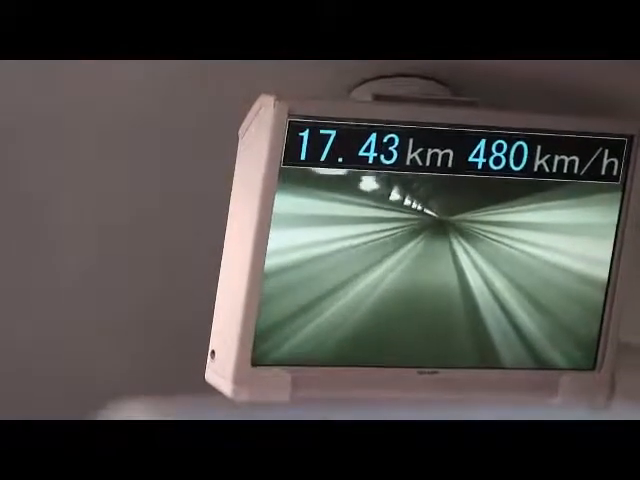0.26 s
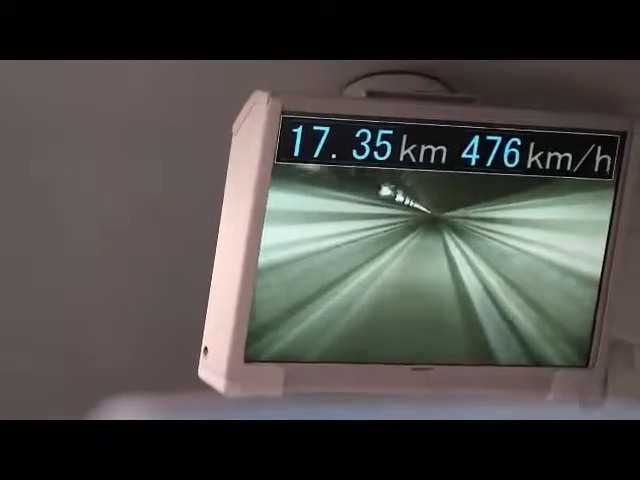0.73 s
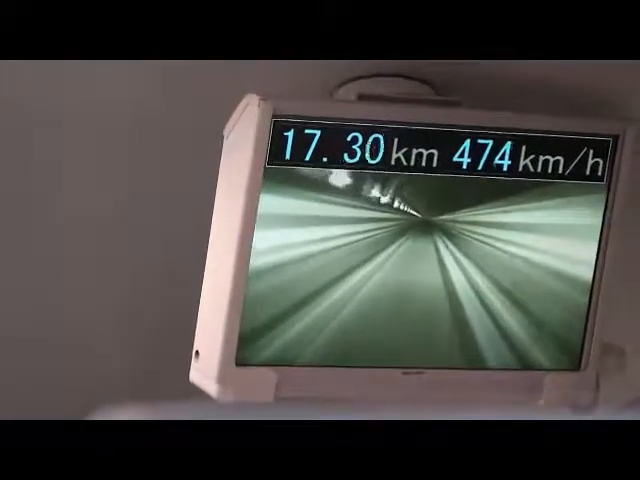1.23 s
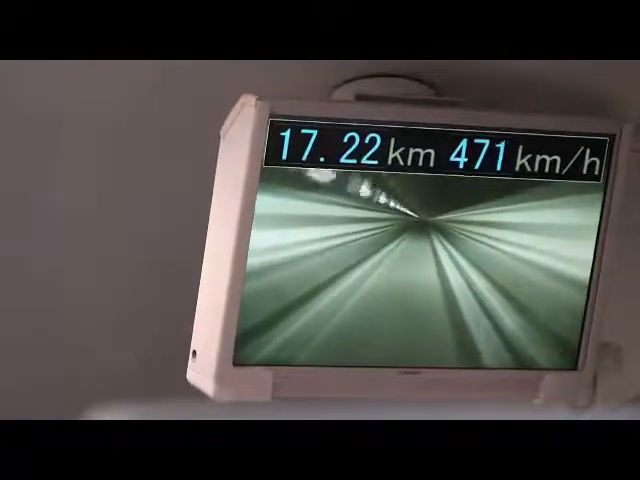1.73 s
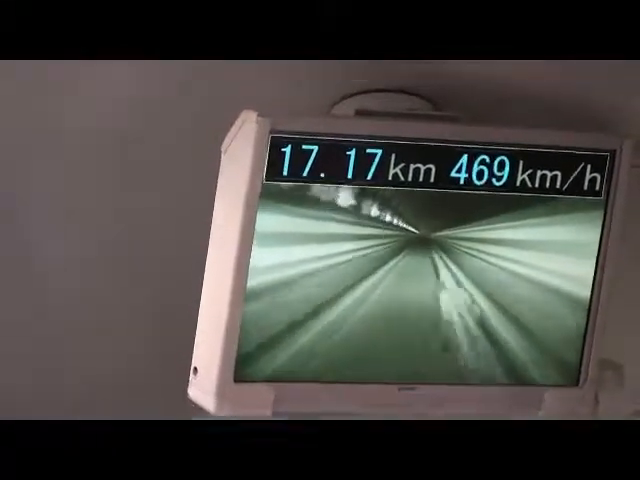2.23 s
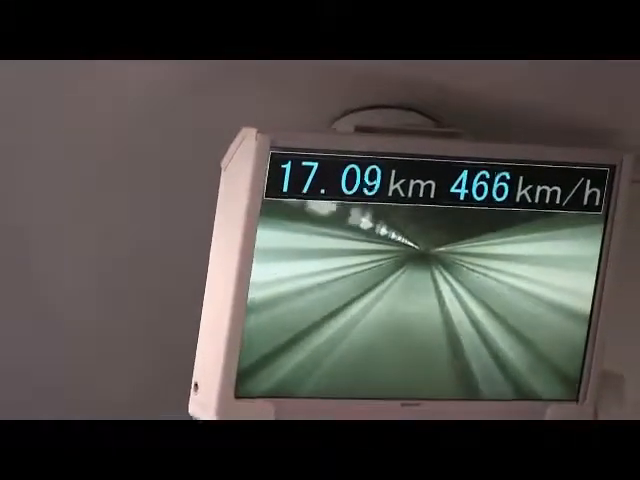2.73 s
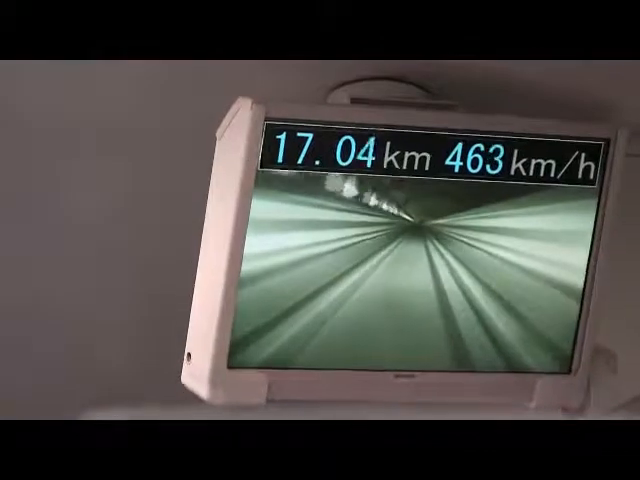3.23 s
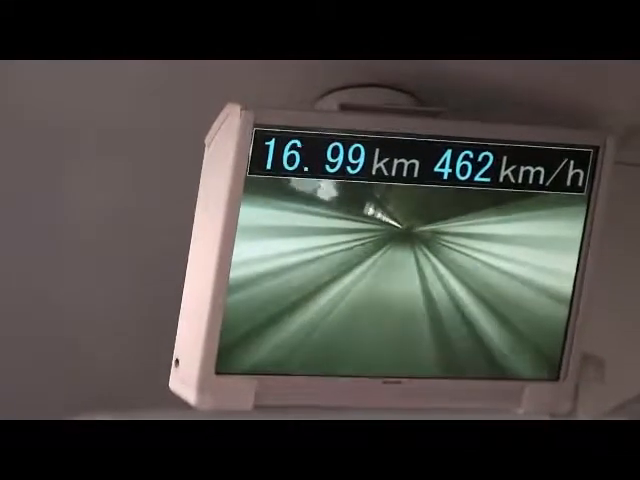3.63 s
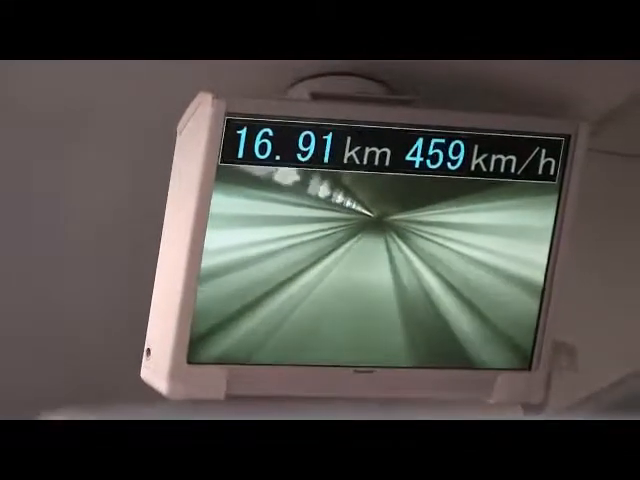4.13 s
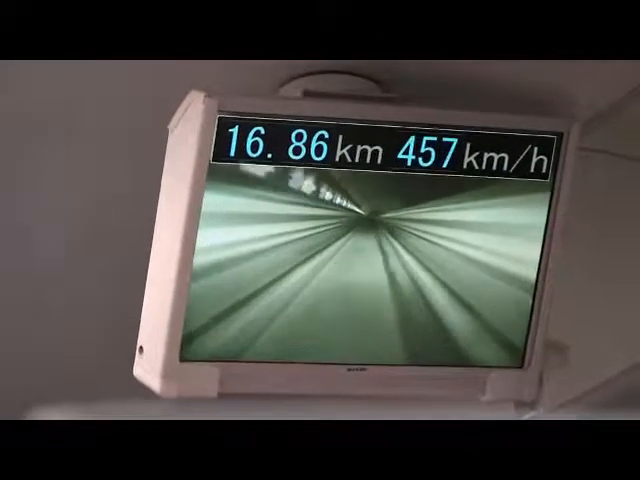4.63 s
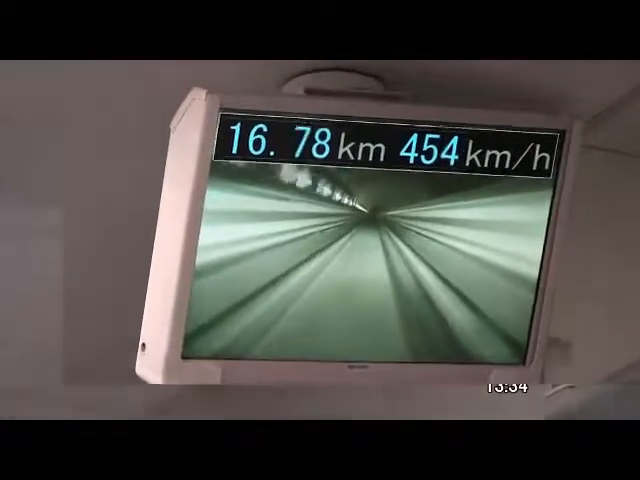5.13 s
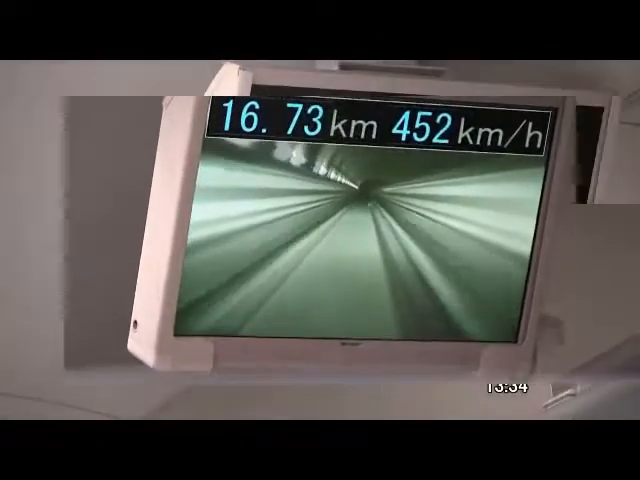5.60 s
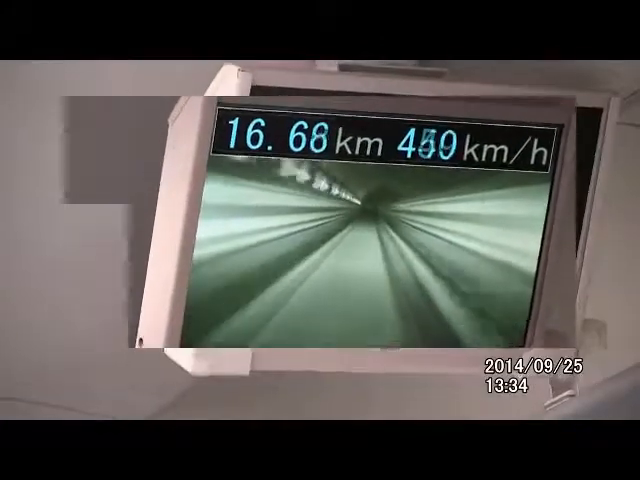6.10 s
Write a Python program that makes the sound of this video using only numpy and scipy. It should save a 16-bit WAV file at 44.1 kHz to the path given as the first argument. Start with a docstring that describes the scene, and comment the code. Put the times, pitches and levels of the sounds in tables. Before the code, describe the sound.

Inside a high-speed train, a loud steady rumble and rush of air carry a slowly sinking hum, broken by two sharp clicks.

```python
"""Maglev braking, cabin interior

Seat position in a maglev train slowing gently in a tunnel, two-channel microphones on a hand-held camera.
Close all round, air rushes over the hull: filtered noise booms, thumps and hisses, over a low sway.
Guideway coils passing below give a hum that sinks with the speed; equipment whines thinly, nearly buried.
Two sharp clicks are sudden steps that relax, the first with a soft knock. Struck resonances of the trim
tick, grainy friction noise gives the scuffs of handling, and a faint rough tone falls near the end."""
import sys
import numpy as np
from scipy import signal
from scipy.fft import rfft, irfft
from scipy.io import wavfile
from scipy.ndimage import uniform_filter1d, minimum_filter1d

SR = 44100
rng = np.random.default_rng(int(sys.argv[2]) if len(sys.argv) > 2 else 0)


def wav_record(signal):
    """Record a signal, one row per channel, as 16-bit PCM in the file named by sys.argv[1]."""
    frames = np.transpose(np.atleast_2d(signal))
    bounded = np.clip(frames, -1, 1)
    # unit amplitude maps onto the largest positive 16-bit level
    quanta = np.round(bounded * 32767).astype(np.int16)
    wavfile.write(sys.argv[1], SR, quanta)


N = 280331  # length in samples

TOP_HZ = 10400  # upper limit of the microphone channel

# air load on the hull, which drives both boom and hiss: [t/s, level/dB]
AIR_LOAD = [(0, 1.5), (.95, 1.1), (1.6, 0.7), (3.4, -0.96), (3.95, 0.5), (4.7, -0.87), (5.35, -1.5),
            (6.05, -3), (6.36, -3)]
# relative noise spectra of boom, hiss and body sway: [f/Hz, level/dB per Hz]
BOOM_SPECTRUM = [(15, -45), (46, -23), (60, -11.5), (72, -8.7), (88, -8), (101, -3), (123, -2.3), (157, -4),
                 (190, -10.7), (240, -17), (305, -19), (360, -29), (480, -50), (1200, -120)]
HISS_SPECTRUM = [(220, -30.5), (320, 4.5), (380, -1.5), (430, 2.5), (500, -0.5), (580, -2.5), (680, -6.5),
                 (1000, -13.5), (1500, -22), (2000, -31), (2400, -35.5), (2750, -53), (3600, -69),
                 (6000, -82.5), (10000, -95.5)]
SWAY_SPECTRUM = [(8, -32), (22, -6.5), (38, -1.5), (55, -8.5), (110, -34.5), (500, -120)]
# the part in which the microphones differ: [f/Hz, side minus mid level/dB]
MIC_DIFFERENCE = [(25, -10), (60, -14.5), (110, -22.5), (170, -16.5), (250, -16.5), (310, -18), (390, -7.5),
                  (560, -11.5), (900, -8.5), (2000, -2), (8000, -10)]
# lean towards the left microphone: [f/Hz, lean/dB, of which the left gains 0.37 and the right loses 0.32]
MIC_LEAN = [(30, -4), (60, 1.9), (115, 3), (170, 3), (260, 2.5), (340, -5), (540, 1), (680, -7.5),
            (1000, -3.5), (1800, -3), (4000, 1.5)]
# levels at a load of 0 dB; the hiss grows faster with the load (dB per dB)
BOOM_DB, HISS_DB, HISS_GROWTH = -13.5, -32.5, 1.3
# eddies buffet the hull at random and make the boom throb (rms dB)
THROB_DB, THROBS_PER_S = 0.45, 15
# the treble of the hiss varies in level at random above this edge (rms dB)
HISS_EDGE_HZ, TREBLE_VARIATION_DB, TREBLE_STEPS_PER_S = 1750, 3, 16

# the ride: [t/s, speed/(km/h)]
TRAIN_SPEED = [(0, 477), (1, 473.3), (3, 463.24), (6.36, 446.31)]
COIL_PITCH_M = .45
# coil hum, swelling as its pitch sinks through a cabin resonance:
# [t/s, left microphone level/dB, right microphone level/dB]
HUM_LEVELS = [(0, -20.5, -33.5), (.5, -21, -32), (.82, -21, -29.5), (1.1, -18.5, -26), (1.7, -16, -20.5),
              (3.2, -17, -24.5), (4.1, -14, -27), (4.9, -17.5, -28.5), (5.6, -18.5, -33),
              (6.36, -23.5, -35.5)]
# weaker lines locked to the coils: [multiple of the coil rate, left level/dB, right level/dB]
HUM_ORDERS = [(.75, -41, -39.5), (1.5, -44, -50.5), (1.75, -65, -59), (2, -55.5, -49)]
# steady whine of on-board equipment, before panning: [f/Hz, level/dB]
EQUIPMENT_TONES = [(600, -51.5), (700, -58.5)]

# the clearer scuffs of handling, level before sag and panning:
# [start t/s, level/dB, length/s before release, centre f/Hz]
SCUFFS = [(0.013, -53, 0.063, 2850), (0.105, -59.5, 0.091, 2570), (0.28, -59, 0.064, 2420),
          (0.426, -59.5, 0.15, 2800), (0.597, -47.5, 0.045, 2030), (0.712, -48.5, 0.11, 2400),
          (0.838, -40.5, 0.071, 1600), (1.09, -52, 0.044, 1930), (1.611, -59, 0.053, 3200),
          (1.921, -52, 0.079, 3190), (1.964, -52, 0.022, 5030), (2, -55, .025, 3000),
          (2.23, -62.5, 0.16, 2200), (2.387, -46.5, 0.048, 3920), (2.55, -61.5, 0.053, 2500),
          (2.922, -58.5, 0.034, 2630), (3.054, -63, 0.072, 3270), (3.92, -61.5, 0.098, 3530),
          (4.93, -59, .07, 2410), (5.027, -57.5, 0.11, 2800), (5.287, -59, 0.063, 3830),
          (5.459, -53.5, 0.061, 2540), (5.605, -57, 0.038, 3010), (5.792, -58.5, 0.063, 3780),
          (5.89, -67.5, 0.11, 3020), (5.977, -69, .06, 2270), (6.079, -57, 0.057, 3060),
          (6.183, -58, 0.039, 2920), (6.269, -61, 0.074, 3160)]
# a scuff catches quickly, weakens as it slides and lets go:
# the sag is taken once at the start and twice by the end of the slide
SCUFF_ATTACK_S, SCUFF_SAG_DB, SCUFF_RELEASE_S = 0.025, 3, .013
HARD_RUB_HZ = 3300  # rubs centred below this are soft cloth, those above it hard plastic
SLIPS_PER_S, SLIP_SPREAD_DB = 630, 4  # surfaces stick and slip in tiny grains

# the biggest eddies stand out as low thumps, level relative to BUFFET_DB:
# [t/s, level/dB, half length/s to 1/e, f/Hz]
BUFFETS = [(0.297, -8, 0.068, 127), (0.558, 1, 0.025, 111), (0.663, 5.5, 0.025, 113.5),
           (0.963, 3, 0.018, 132), (1.024, 5, 0.038, 123), (1.182, 0, 0.045, 115.3),
           (1.382, 2.5, 0.052, 120.5), (1.721, 3.5, 0.028, 136), (2.19, 2, .04, 115),
           (2.69, -0.5, .04, 122), (2.871, 0, 0.03, 111), (3.053, -1.5, 0.025, 117.6),
           (3.245, 1.5, 0.021, 123), (3.49, 4, 0.032, 124.6), (3.574, 3.5, 0.021, 122.4),
           (3.755, -0.5, 0.034, 119.4), (3.952, -3, 0.05, 165), (4.159, -2.5, 0.025, 133.3),
           (4.404, 0, 0.037, 131), (4.71, 5, 0.033, 142.5), (5.006, 0.5, 0.021, 137),
           (5.164, 1, 0.059, 125.7), (5.57, 2, 0.048, 131.6), (6.029, -0.5, 0.088, 128.3)]
BUFFET_DB, BUFFET_WIDTH = -15.5, 0.28  # width / centre of each single resonance

# light ticks of plastic trim, peak 6 dB above the level given, before panning:
# [t/s, level/dB, brightness of the contact f/Hz, decay/s, left minus right/dB]
TICKS = [(0.629, -49, 1500, .006, -6), (1.619, -55, 9500, .003, -8.5), (1.655, -57, 3500, .004, -5.5),
         (1.955, -52, 5040, .004, -9.5), (1.982, -52.5, 9100, .007, -14), (2.416, -36, 6000, 0.0072, -8),
         (3.7316, -46.5, 1200, 0.00087, -21), (3.968, -56.5, 9040, .006, -8),
         (5.319, -57, 8000, .006, -5.5)]
# what the trim rings with: [f/Hz, width / centre of a single resonance, level/dB]
TRIM_MODES = [(1350, .45, -4.5), (2100, 0.43, -1), (3280, 0.17, 4.5), (4240, 0.17, -12.5), (5930, 0.22, -9),
              (8500, .25, -14.5)]

# sharp clicks, each a sudden step that relaxes:
# [t/s, step height/dB before panning, relaxation/s, bright edge f/Hz, left minus right/dB]
CLICKS = [(0.831, -6.5, 0.0023, 5250, 3.5), (3.7752, -4, 0.0019, 7660, 2)]
# a soft knock in the car body swells just ahead of the first click
KNOCK_LEAD_S, KNOCK_DB, KNOCK_HZ, KNOCK_HALF_S = 0.0061, -11, 220, 0.022

# a faint falling tone near 850 Hz, with much weaker rough treble bands above it,
# before stutter and panning: [f/Hz at its start, level/dB]
SQUEAK_BANDS = [(850, -53), (2700, -67), (3700, -67), (4450, -67), (6500, -69), (7000, -70)]
# the pitch falls as the rub slows, one step per catch
SQUEAK_S, SQUEAK_LENGTH_S, SQUEAK_FALL_OCT_PER_S = 5.805, 0.19, 1.8
SQUEAK_STEP_S = 0.031  # time between catches


def undb(db):
    """Decibels to gain."""
    return 10 ** (np.asarray(db) / 20)


def curves(table):
    """Each column of a table joined by straight lines in time."""
    s, *columns = np.transpose(table)
    return [np.interp(np.arange(N) / SR, s, column) for column in columns]


def colour(x, points, power=1):
    """Filter by (Hz, dB) points joined on a log-frequency axis, the dB scaled by power."""
    hz, db = np.transpose(points)
    bins = np.maximum(np.fft.rfftfreq(N, 1 / SR), 1)
    response_db = power * np.interp(np.log(bins), np.log(hz), db)
    return irfft(rfft(x) * undb(response_db), N)


def low_pass(order, hz):
    """Butterworth sections that dull a sound above the edge."""
    return signal.butter(order, hz, fs=SR, output="sos")


def resonate(x, hz, width):
    """A resonance applied twice, for steep sides; width is a share of the centre for one pass."""
    b, a = signal.iirpeak(hz, 1 / width, fs=SR)
    return signal.lfilter(b, a, signal.lfilter(b, a, x))


def unit(x):
    """Scale to rms 1."""
    return x / np.sqrt(np.mean(x ** 2))


def walk(rate):
    """Chance drift of rms 1: random levels held 1 / rate s and slewed twice."""
    k = int(SR / rate)
    held = np.repeat(rng.standard_normal(N // k + 1), k)[:N]
    return unit(uniform_filter1d(uniform_filter1d(held, k), k))


def pan(db):
    """Left and right gains for a level difference."""
    return undb(np.array([[db], [-db]]) / 2)


def cabin_field(spectrum):
    """Turbulence through the hull: long waves reach both microphones alike, short ones do not."""
    mid = unit(colour(rng.standard_normal(N), spectrum))
    side = unit(colour(rng.standard_normal(N), spectrum))
    side = colour(side, MIC_DIFFERENCE)
    left = colour(mid + side, MIC_LEAN, 0.37)
    right = colour(mid - side, MIC_LEAN, -0.32)
    return np.array([left, right])


def uneven_treble(hiss):
    """The treble of the hiss varies in level at random above the edge."""
    body = signal.sosfiltfilt(low_pass(4, HISS_EDGE_HZ), hiss)
    return body + (hiss - body) * undb(TREBLE_VARIATION_DB * walk(TREBLE_STEPS_PER_S))


def air_rush(flutter_db=0.86, settle_s=0.085, sway_db=-36.5, sway_swell_db=2):
    """Turbulence drives a throbbing boom, a slow body sway below it, and a hiss fluttering with the eddies."""
    load_db, = curves(AIR_LOAD)
    boom, hiss = cabin_field(BOOM_SPECTRUM), cabin_field(HISS_SPECTRUM)
    sway = cabin_field(SWAY_SPECTRUM)
    # the boom throbs quickly, but over longer spans its power follows the air load
    span = int(settle_s * SR)
    power = uniform_filter1d(boom.mean(axis=0) ** 2, span)
    boom = boom / np.sqrt(uniform_filter1d(power, span // 2))
    boom = boom * undb(BOOM_DB + load_db + THROB_DB * walk(THROBS_PER_S))
    hiss_db = HISS_DB + HISS_GROWTH * load_db + flutter_db * walk(14)
    hiss = uneven_treble(hiss) * undb(hiss_db)
    sway = sway * undb(sway_db + sway_swell_db * walk(1.5))
    return boom + buffets(boom) + hiss + sway


def coil_hum(tremble_db=0.9, waver_db=1.0, wander_rad=0.94):
    """Every guideway coil tugs at the magnets as it passes: rate = speed / coil pitch."""
    speed_kmh, = curves(TRAIN_SPEED)
    coil_hz = speed_kmh / 3.6 / COIL_PITCH_M
    phase = 2 * np.pi * np.cumsum(coil_hz) / SR
    hum_db = np.array(curves(HUM_LEVELS)) + tremble_db * walk(13)
    out = undb(hum_db) * np.sin(phase)
    for order, left_db, right_db in HUM_ORDERS:
        line = undb(waver_db * walk(2.6)) * np.sin(order * phase + wander_rad * walk(3.3))
        out = out + undb([[left_db], [right_db]]) * line
    return np.sqrt(2) * out  # table levels are rms


def equipment(waver_db=2, wander_rad=.5, pan_db=-2):
    """Thin steady tones, nearly buried in the rush, waver in level and phase."""
    t = np.arange(N) / SR
    tones = 0
    for hz, db in EQUIPMENT_TONES:
        level = undb(db + waver_db * walk(6.7))
        tones = tones + level * np.sin(2 * np.pi * hz * t + wander_rad * walk(3.4))
    return np.sqrt(2) * pan(pan_db) * tones


def surface(friction, hz, width=0.3, band_db=2, band_width=0.045, reach=2.1, count=3):
    """Friction noise around a broad centre, random narrow bands colour it; low rubs are duller and smoother."""
    hardness = hz / HARD_RUB_HZ
    bands = 0
    for octaves in rng.uniform(-.55, .5, count):
        bands = bands + resonate(friction, hz * 2 ** octaves, band_width)
    broad = resonate(friction, hz, width / min(hardness, 1))
    rub = broad + undb(band_db) * hardness ** 2 * bands
    return unit(signal.sosfilt(low_pass(4, min(reach * hz, TOP_HZ)), rub))


def scuffs(pan_db=-3, smooth_db=-4, apart_db=-6, grip_db=0.5, grips_per_s=80):
    """Rubs of cloth and plastic: stick-slip grains over smooth friction noise, with an uneven grip."""
    slips = (rng.random(N) < SLIPS_PER_S / SR) * rng.choice([-1, 1], N)
    slips = slips * undb(SLIP_SPREAD_DB * rng.standard_normal(N))
    friction = unit(slips) + undb(smooth_db) * rng.standard_normal(N)
    friction = friction + undb(apart_db) * rng.standard_normal((2, N))  # differs between microphones
    friction = friction * undb(grip_db * walk(grips_per_s))
    out = np.zeros((2, N))
    for s, db, length_s, hz in SCUFFS:
        span = slice(int(s * SR), int((s + length_s + 10 * SCUFF_RELEASE_S) * SR))
        rub = surface(friction[:, span], hz)
        t = np.arange(rub.shape[1]) / SR
        catch = np.minimum(t / SCUFF_ATTACK_S, 1)
        sag = undb(SCUFF_SAG_DB * (-1.0 - t / length_s))
        release = np.exp(-np.maximum(t - length_s, 0) / SCUFF_RELEASE_S)
        out[:, span] += undb(db) * catch * sag * release * rub
    return pan(pan_db) * out


def buffets(boom):
    """Each large eddy briefly rings the cabin at a pitch of its own, on top of the boom."""
    out = np.zeros((2, N))
    for s, db, half_s, hz in BUFFETS:
        span = slice(int((s - 4 * half_s) * SR), int((s + 4 * half_s) * SR))
        ring = resonate(boom[:, span], hz, BUFFET_WIDTH)
        swell = np.exp(-((np.arange(N)[span] / SR - s) / half_s) ** 2)
        # level is set by the left microphone, weighted to the height of the swell
        loudness = np.sqrt(np.average(ring[0] ** 2, weights=swell ** 2))
        out[:, span] += undb(BUFFET_DB + db) * swell * ring / loudness
    return out


def fittings():
    """Brief contacts ring the damped modes of the plastic trim."""
    t, ticks = np.arange(N) / SR, 0
    for s, db, bright_hz, decay_s, pan_db in TICKS:
        contact = rng.standard_normal(N) * (t >= s) * np.exp(-abs(t - s) / decay_s)
        contact = signal.sosfilt(low_pass(2, bright_hz), contact)
        ring = sum(undb(mode_db) * resonate(contact, hz, width) for hz, width, mode_db in TRIM_MODES)
        ticks = ticks + 2 * undb(db) * pan(pan_db) * ring / abs(ring).max()
    return ticks


def knock(pan_db=2):
    """The car body gives a few low cycles that swell and die away."""
    t = np.arange(N) / SR - (CLICKS[0][0] - KNOCK_LEAD_S)
    swell = np.exp(-(t / KNOCK_HALF_S) ** 2)
    return undb(KNOCK_DB) * pan(pan_db) * swell * np.sin(2 * np.pi * KNOCK_HZ * t)


def clicks(lead_share=0.59, edge_db=-19, edge_s=0.00023):
    """The level is drawn down briefly, snaps up within a sample with a very short bright edge, and relaxes."""
    out = 0
    for s, db, relax_s, edge_hz, pan_db in CLICKS:
        t = np.arange(N) / SR - s
        step = np.where(t < 0, -lead_share, 1 - lead_share) * np.exp(-abs(t) / relax_s)
        edge = (t >= 0) * np.exp(-abs(t) / edge_s) * np.sin(2 * np.pi * edge_hz * t)
        out = out + undb(db) * pan(pan_db) * (step + undb(edge_db) * edge)
    return out


def squeak(jitter=0.013, stutter_db=6, pan_db=-2):
    """A faint tone and weaker rough treble bands stutter and sink a step each time the rub catches."""
    t = np.clip(np.arange(N) / SR - SQUEAK_S, 0, SQUEAK_LENGTH_S)
    pitch = 2 ** (-SQUEAK_FALL_OCT_PER_S * (t - t % SQUEAK_STEP_S))
    bands = 0
    for hz, db in SQUEAK_BANDS:
        level = undb(db + stutter_db * walk(70))
        rough_pitch = pitch * (1 + jitter * walk(1200))
        bands = bands + level * np.sin(2 * np.pi * hz * np.cumsum(rough_pitch) / SR)
    swell = np.sqrt(2 * abs(np.sin(np.pi * t / SQUEAK_LENGTH_S)))
    return swell * pan(pan_db) * bands


def scene():
    """Everything heard from the seat."""
    ride = air_rush() + coil_hum() + equipment()
    return ride + scuffs() + fittings() + knock() + clicks() + squeak()


def record(dry, ceiling_db=-1.0):
    """The camera's limiter eases the gain down around the highest peaks; the top is cut."""
    span = int(.012 * SR)
    peak = abs(dry).max(axis=0) + 1e-9
    allowed = np.minimum(1, undb(ceiling_db) / peak)
    held = minimum_filter1d(allowed, 2 * span)
    gain = uniform_filter1d(uniform_filter1d(held, span), span)
    top_cut = signal.ellip(10, .2, 80, TOP_HZ, fs=SR, output="sos")
    return signal.sosfilt(top_cut, dry * gain)


dry = scene()
out = record(dry)
wav_record(out)
```